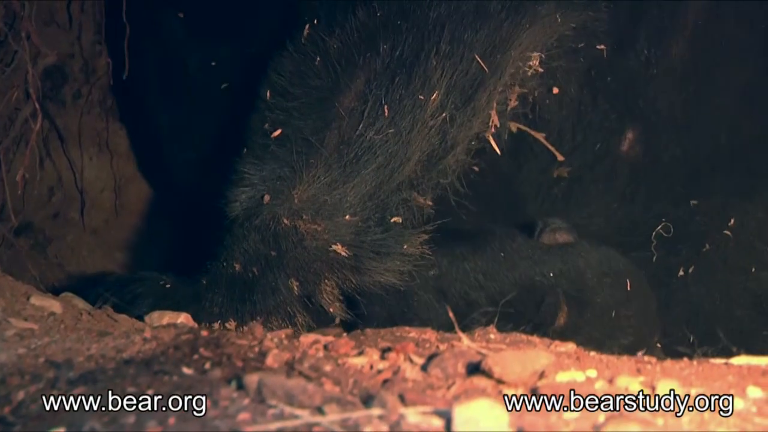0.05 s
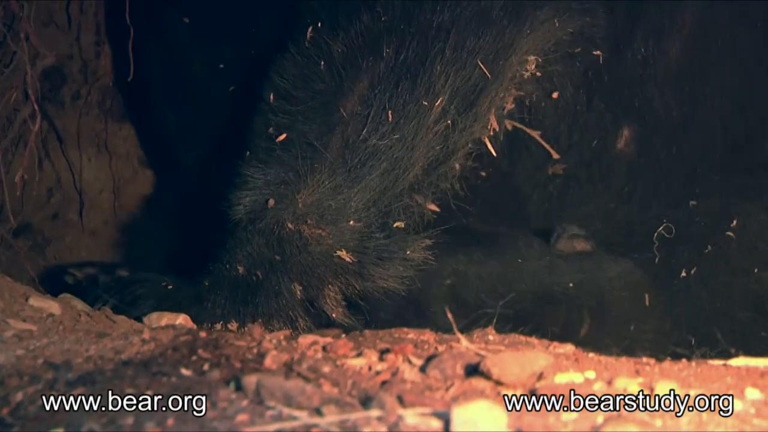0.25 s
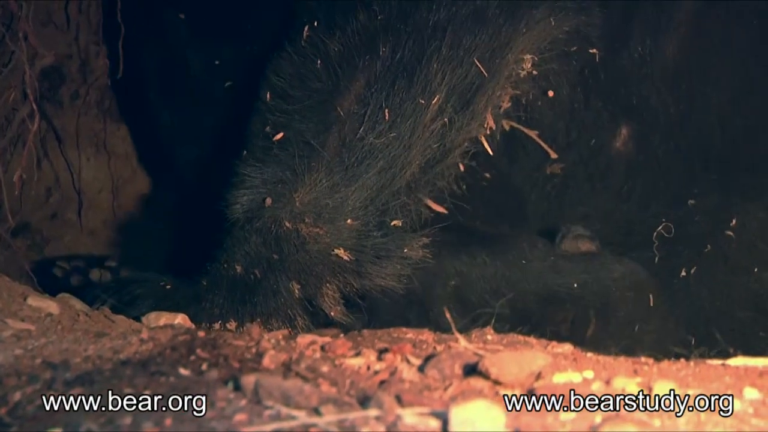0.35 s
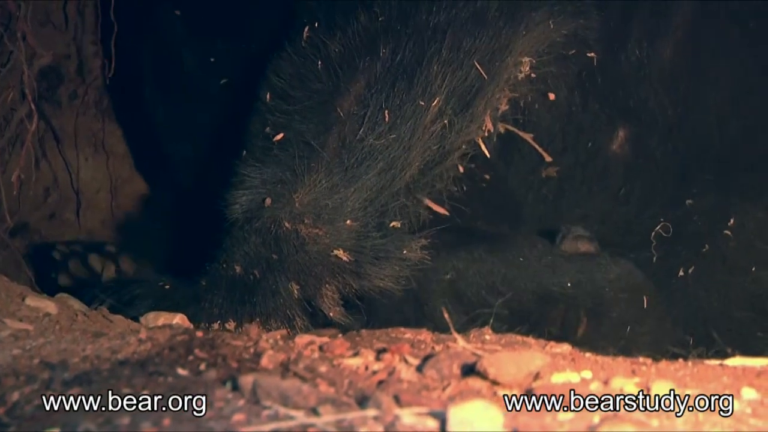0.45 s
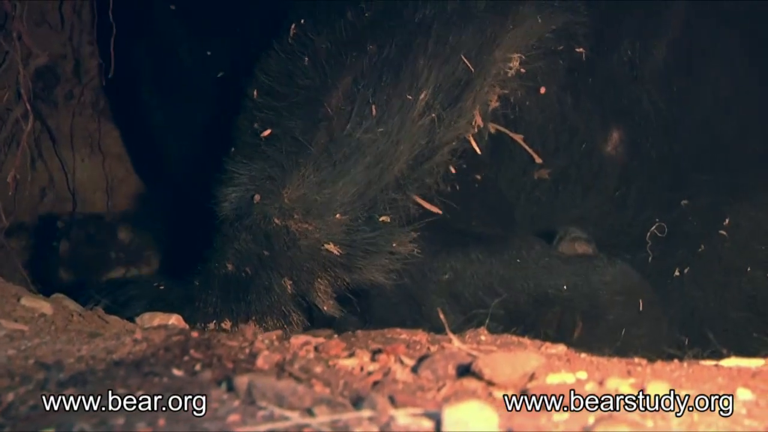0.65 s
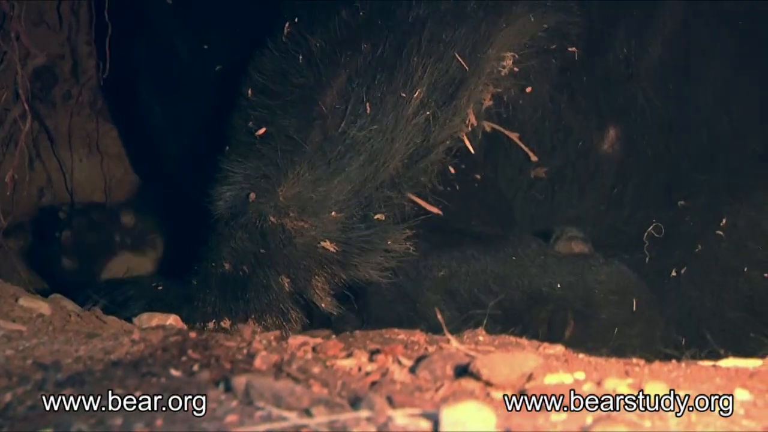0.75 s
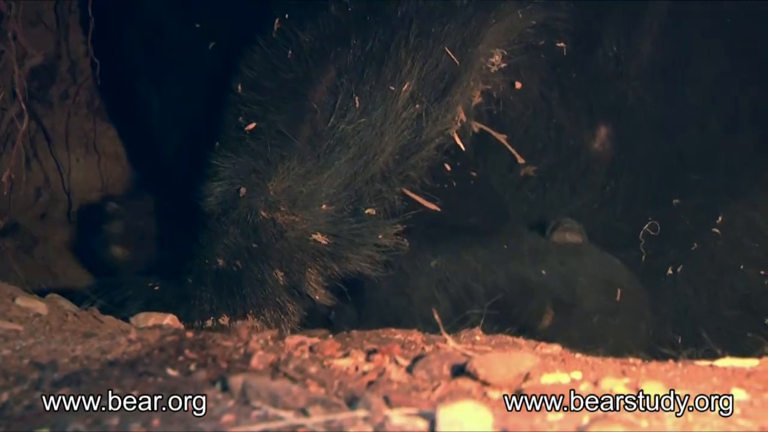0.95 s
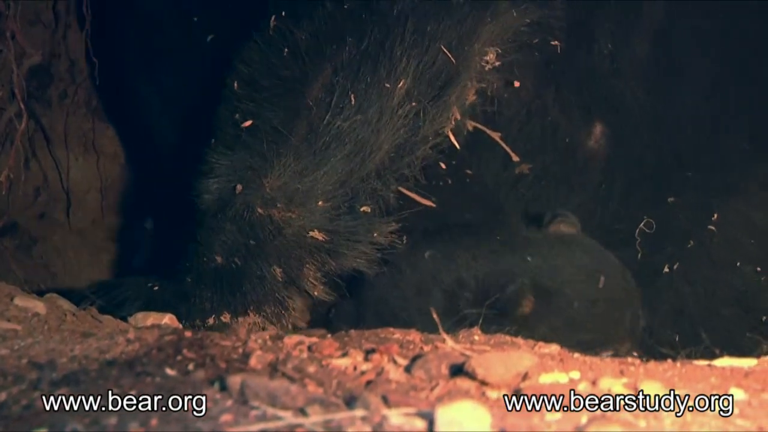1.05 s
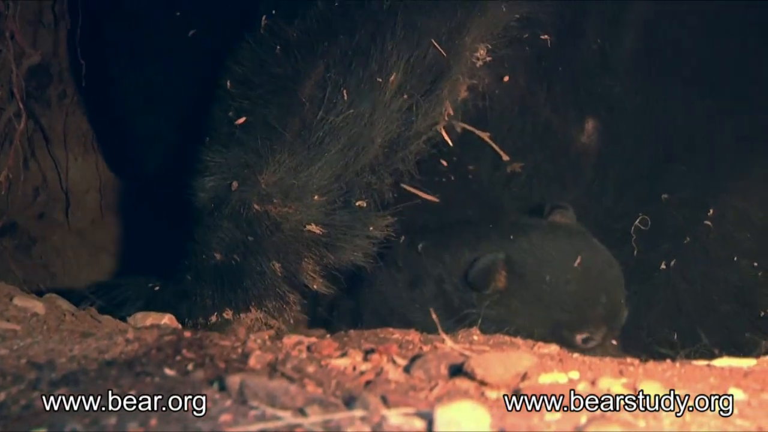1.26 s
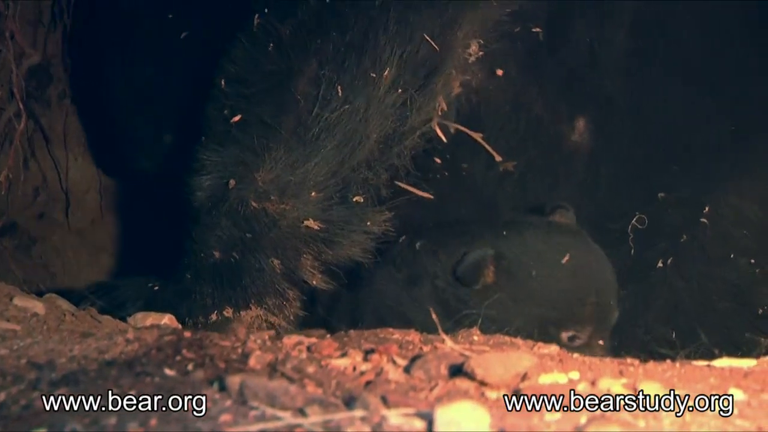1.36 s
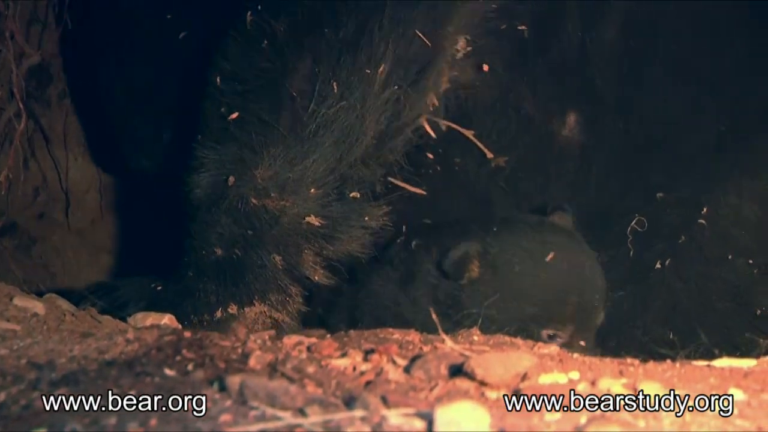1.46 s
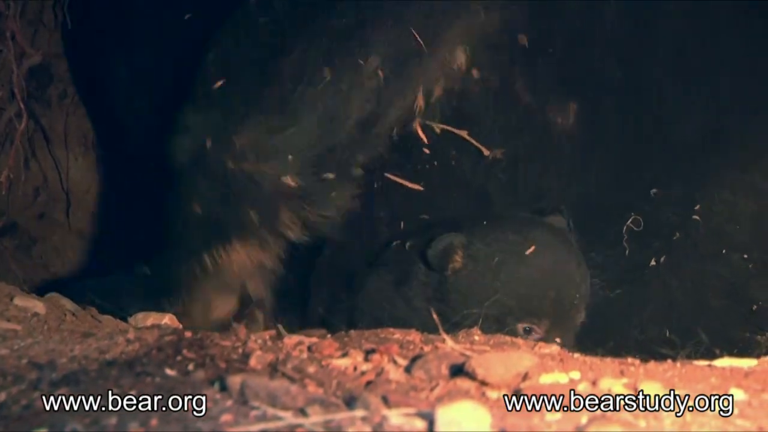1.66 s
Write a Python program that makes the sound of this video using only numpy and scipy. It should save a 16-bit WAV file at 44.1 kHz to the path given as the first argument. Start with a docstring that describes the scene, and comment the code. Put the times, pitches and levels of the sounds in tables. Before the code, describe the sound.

Close up in an earthen den, a bear lets out one short whining moan that roughens into a growl over a low thud. Afterwards dry bedding crackles faintly and paws knock on the ground, over low rumble and hiss.

```python
"""A bear moans once, close to the microphone in a small earth den. Its vocal folds vibrate evenly in a
rising whine, break hoarse, swell into a sputtering growl and end on a short lower note.
Shifting bodies thud and knock on the ground; dry bedding crackles and rustles under their fur.
The walls give voice and bedding a very short tail. Mono, over a low rumble and microphone hiss."""
import sys
import numpy as np
from scipy import signal
from scipy.fft import rfft, irfft
from scipy.io import wavfile
from scipy.ndimage import uniform_filter1d

SR = 44100
rng = np.random.default_rng(int(sys.argv[2]) if len(sys.argv) > 2 else 0)


def wrap_up_sound(samples):
    """Save the sound to the file named by the first command line argument, as 16-bit audio."""
    columns = np.atleast_2d(samples).T
    # keep every value between -1 and 1, then stretch to whole-number steps
    tamed = np.clip(columns, -1, 1)
    steps = np.round(tamed * 32767).astype(np.int16)
    wavfile.write(sys.argv[1], SR, steps)


N = 74970
T = np.arange(N) / SR

# Pitch of the moan. Each row: time in seconds, pitch in Hz.
MOAN_PITCH = [(.11, 252), (.124, 270), (.146, 283), (.173, 350), (.2, 380), (.228, 409), (.266, 419),
              (.284, 384), (.315, 392), (.345, 404), (.368, 416), (.405, 407), (.48, 396), (.525, 325),
              (.56, 317), (.572, 395), (.6, 410)]
# The clear, hoarse and growling voice. Each row: time in seconds, level in dB.
CLEAR_LEVEL = [(.10, -77), (.116, -52), (.145, -44), (.2, -42), (.22, -41), (.265, -34), (.29, -39.5),
               (.36, -35), (.405, -34.5), (.44, -36.5), (.475, -44.5), (.5, -47), (.538, -37.5), (.56, -42),
               (.578, -49), (.6, -80)]
HOARSE_LEVEL = [(0.099, -71.5), (0.115, -47), (0.132, -49.5), (0.148, -67.5), (0.268, -68), (.276, -37.5),
                (.315, -36), (.355, -35.5), (.37, -38), (0.411, -37.5), (.43, -37)]
GROWL_LEVEL = [(0.41, -54.5), (0.418, -32.5), (0.432, -33.5), (.445, -29), (0.458, -36.5), (0.47, -28.5),
               (.497, -31), (.508, -29), (.536, -30.5), (0.545, -67)]
# Lift of the clear overtones against the fundamental. Each row: time in seconds, gain in dB.
OVERTONE_LIFT = [(.12, 1), (.15, 3), (.18, 3), (.215, 4), (.265, 1), (.3, -10), (.38, -3), (.54, -2.5),
                 (.58, -7.5)]
# The throat in each voice, mouth wider in the growl. Each row: frequency in Hz, relative gain in dB.
CLEAR_THROAT = [(255, -8), (300, 1.5), (400, 6), (540, 8.5), (700, -8), (840, 0.5), (1060, -8),
                (1150, -9.5), (1235, -36), (1700, -29), (2400, -32), (4000, -39)]
HOARSE_THROAT = [(80, -53.5), (230, -2.5), (300, -19), (370, -4), (470, -2.5), (560, 4), (670, -14.5),
                 (850, -5), (980, -5.5), (1150, -10), (1240, -19.5), (1400, -18.5), (1680, -24.5),
                 (1930, -27), (2350, -38.5), (3050, -32), (3780, -41), (4030, -35), (4600, -45.5),
                 (12000, -54)]
GROWL_THROAT = [(80, -45), (220, -16), (330, -9), (405, -5.5), (478, 2.5), (560, -1.5), (635, -18.5),
                (695, -4), (760, -19.5), (840, -8), (940, -12.5), (1085, -7), (1150, -16.5), (1230, -39),
                (1290, -24), (1430, -18.5), (1650, -41.5), (1780, -32), (2400, -52), (3050, -39),
                (3600, -51), (4150, -38.5), (4500, -50), (5200, -70), (12000, -75)]
# A heavy thud and paw knocks. Each row: start in seconds, peak level in dB.
BODY_THUD = [(.371, -23)]
PAW_KNOCKS = [(.063, -39), (1.2905, -28.5), (1.501, -38.5), (1.528, -50)]
# The ground ringing under them. Each row: frequency in Hz, relative gain in dB, seconds to fall 60 dB.
THUD_MODES = [(80.5, 9, 0.11), (107, -18, .05), (203.5, 5, 0.11)]
KNOCK_MODES = [(91.4, 0, 0.047), (207, -1, 0.042), (360, 2.5, 0.024), (623, 7.5, 0.015), (1082, 0.5, 0.039),
               (1480, -18, 0.014)]
# Dry stalks snapping. Each row: start in seconds, level in dB, centre in Hz, decay in seconds.
STALK_CRACKLES = [(0.15, -41.5, 2800, 0.0015), (0.159, -53.5, 2940, 0.0039), (.24, -42.5, 2280, 0.0017),
                  (0.279, -52.5, 3260, 0.0034), (0.331, -50.5, 3060, 0.0045), (.533, -52.5, 5450, 0.0025),
                  (.798, -52, 2200, 0.0038), (0.819, -51, 2580, .003), (1.291, -53, 2810, 0.0022),
                  (1.407, -56, 4000, 0.0028)]
# Fur brushing the bedding. Each row: midpoint in seconds, level in dB, half length in seconds.
FUR_BRUSHES = [(.8, -57, 0.0061), (1.119, -52, 0.0077)]
# Soft shuffling and the den's low rumble. Each row: time in seconds, level in dB.
SHUFFLE_LEVEL = [(0, -65), (.075, -57), (.2, -52.5), (.3, -49.5), (.6, -54.5), (.74, -52), (.82, -55.5),
                 (.92, -71.5), (1.1, -58), (1.3, -58), (1.5, -56.5), (1.7, -65)]
RUMBLE_LEVEL = [(0, -52.5), (.08, -52.5), (.17, -56), (.27, -48), (.6, -70.5), (.81, -52), (1.05, -51.5),
                (1.25, -57.5), (1.37, -52), (1.47, -55.5), (1.61, -53), (1.7, -48)]
# Tone of fur, shuffling, rumble and microphone hiss. Each row: frequency in Hz, relative gain in dB.
BRUSH_COLOUR = [(200, -11), (700, 0.5), (2200, -4), (4000, -14), (11000, -13.5)]
SHUFFLE_COLOUR = [(60, 8.5), (250, -1.5), (450, -1), (700, -4), (1100, -6.5), (1800, -19), (5000, -36)]
RUMBLE_COLOUR = [(12, 3), (38, -7.5), (55, 1.5), (82, 2), (125, -11.5), (200, -16), (400, -27), (1500, -87)]
HISS_COLOUR = [(100, -7.5), (250, 1.5), (400, -6.5), (700, -7.5), (1100, -13), (1800, -15.5), (3000, -17),
               (6000, -19.5), (11500, -21)]


def bear_moan(smooth_waver=.0014, rough_waver=.018):
    """Clear, hoarse and growling voice share one pitch, which wavers more as the folds turn rough."""
    rough = envelope(HOARSE_LEVEL) + envelope(GROWL_LEVEL)
    rough_share = rough / (rough + envelope(CLEAR_LEVEL) + 1e-9)
    waver = (smooth_waver + rough_waver * rough_share) * wander(rate_hz=150)
    hz = curve(MOAN_PITCH) * (1 + waver)
    hoarse = rough_voice(hz, HOARSE_LEVEL, HOARSE_THROAT, jitter=.2, snap_db=-7.5)
    growl = rough_voice(hz, GROWL_LEVEL, GROWL_THROAT, jitter=.18, snap_db=-.5)
    return clear_voice(hz) + hoarse + growl


def clear_voice(hz, harmonics=10):
    """Evenly vibrating folds give harmonics shaped by the throat."""
    phase = 2 * np.pi * np.cumsum(hz) / SR
    k = np.arange(1, harmonics + 1)[:, None]
    gains = response(k * hz, CLEAR_THROAT) * undb((k > 1) * curve(OVERTONE_LIFT))
    tone = (gains * np.cos(k * phase)).sum(axis=0)
    rms = np.sqrt((gains ** 2).sum(axis=0) / 2)
    return tone / rms * envelope(CLEAR_LEVEL)


def rough_voice(hz, level, throat, jitter, snap_db, sputter_hz=85.06, air_db=-19.5):
    """Chaotic folds snap shut at uneven times and flutter in between; pulses and air ring the throat."""
    cycles = uneven(np.cumsum(hz) / SR, jitter)
    sputter_cycles = uneven(T * sputter_hz, jitter=.17)
    flutter = fold_pulses(cycles)
    snaps = fold_pulses(sputter_cycles)
    air = unit(noise() * np.exp(-2 * (cycles % 1)))  # a turbulent puff each cycle
    source = flutter + undb(snap_db) * snaps + undb(air_db) * air
    voice = colour(source - source.mean(), throat)
    running_rms = np.sqrt(uniform_filter1d(voice ** 2, int(.022 * SR)))
    return voice / running_rms * envelope(level)


def fold_pulses(cycles, shimmer_db=2):
    """The folds give one pulse a cycle, each of its own strength."""
    pulses = np.diff(np.floor(cycles), prepend=0)
    return unit(pulses * undb(shimmer_db * np.clip(noise(), -2, 2)))


def ground_blows(rows, modes, contact_s):
    """Soft pushes of a body or paw ring a few well damped modes of the ground."""
    ring = sum(undb(db) * np.cos(2 * np.pi * hz * T) * die_away(t60) for hz, db, t60 in modes)
    onset = 1 - np.exp(-T / contact_s)
    push = np.sin(np.pi * np.minimum(T / contact_s, 1))
    blow = signal.fftconvolve(ring * onset, push)[:N]
    blow /= np.abs(blow).max()
    return sum(undb(db) * np.interp(T - start, T, blow, left=0) for start, db in rows)


def bedding(flicker_db=3, crackle_octaves=.42):
    """Bodies shuffle, dry stalks snap and fur brushes over them."""
    flickering = noise() * undb(flicker_db * wander(rate_hz=30))
    rustle = colour(flickering, SHUFFLE_COLOUR) * undb(curve(SHUFFLE_LEVEL))
    octave = np.log2(np.maximum(np.fft.rfftfreq(N, 1 / SR), 1))
    for start, db, hz, decay in STALK_CRACKLES:
        band = 1 / (1 + ((octave - np.log2(hz)) / crackle_octaves) ** 2) ** 2
        snap = unit(irfft(rfft(noise()) * band, N))
        rustle += undb(db) * snap * (T >= start) * np.exp(-np.abs(T - start) / decay)
    strokes = sum(undb(db) * np.exp(-.5 * ((T - mid) / half) ** 2) for mid, db, half in FUR_BRUSHES)
    return rustle + strokes * colour(noise(), BRUSH_COLOUR)


def den_walls(x, tail_db=-15, t60_s=.11):
    """Close earth walls add a very short tail, 3 ms behind the direct sound."""
    tail = noise() * die_away(t60_s) * (T > .003)
    tail /= np.sqrt(np.sum(tail ** 2))
    return x + undb(tail_db) * signal.fftconvolve(x, tail)[:N]


def room_tone(hiss_db=-58):
    """A low rumble swells and sinks in the den under steady microphone hiss."""
    rumble = colour(noise(), RUMBLE_COLOUR) * undb(curve(RUMBLE_LEVEL))
    return rumble + colour(noise(), HISS_COLOUR) * undb(hiss_db)


def undb(db):
    """Decibels to gain."""
    return 10 ** (np.asarray(db) / 20)


def unit(x):
    """Scale to rms 1."""
    return x / np.sqrt(np.mean(x ** 2))


def die_away(t60_s):
    """Gain that falls 60 dB in the given time."""
    return np.exp(-np.log(1000) * T / t60_s)


def curve(rows):
    """Straight lines through rows of time and value."""
    return np.interp(T, *np.array(rows).T)


def envelope(rows):
    """Gain from rows of seconds and dB, silent outside them."""
    return undb(curve(rows)) * (T > rows[0][0]) * (T < rows[-1][0])


def response(hz, points):
    """Gain at the given frequencies, from rows of Hz and dB."""
    row_hz, db = np.array(points).T
    return undb(np.interp(np.log(np.maximum(hz, 1)), np.log(row_hz), db))


def colour(x, points):
    """Minimum-phase filter from rows of Hz and dB; rms 1 out."""
    hz = np.arange(N + 1) * SR / (2 * N)
    cepstrum = irfft(np.log(response(hz, points)))
    cepstrum[1:N] *= 2
    cepstrum[N + 1:] = 0
    return unit(irfft(rfft(x, 2 * N) * np.exp(rfft(cepstrum)))[:N])


def noise():
    """White noise."""
    return rng.standard_normal(N)


def wander(rate_hz):
    """Smooth random drift of rms 1."""
    width = int(SR / rate_hz)
    return unit(uniform_filter1d(uniform_filter1d(noise(), width), width))


def uneven(cycles, jitter):
    """Cycle count of an oscillator whose every period has its own length."""
    lengths = np.exp(jitter * rng.standard_normal(size=2000))
    return np.interp(cycles, np.cumsum(lengths) - lengths[0], np.arange(len(lengths)))


def scene():
    """One microphone in the den: the moan and the movements, over rumble and hiss."""
    moan = bear_moan()
    thud = ground_blows(BODY_THUD, THUD_MODES, contact_s=.003)
    knocks = ground_blows(PAW_KNOCKS, KNOCK_MODES, contact_s=.0014)
    background = room_tone()
    return (den_walls(moan + bedding()) + thud + knocks + background)[None]


def record(dry):
    """The recorder cuts the top steeply."""
    top_hz = 11950
    return signal.sosfilt(signal.ellip(10, .2, 60, top_hz, fs=SR, output="sos"), dry)


dry = scene()
out = record(dry)
wrap_up_sound(out)
```